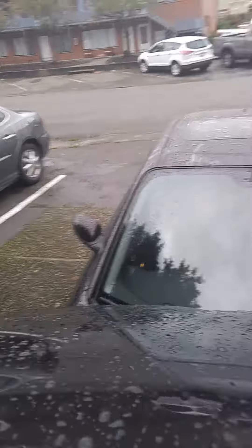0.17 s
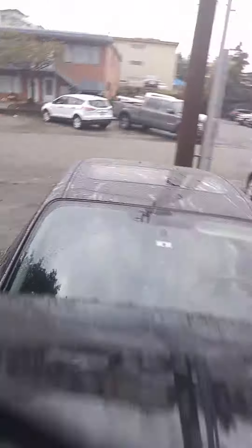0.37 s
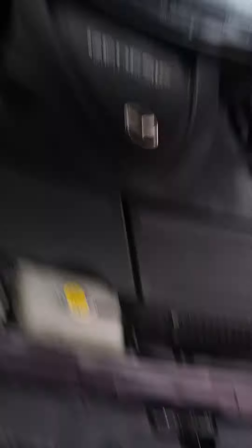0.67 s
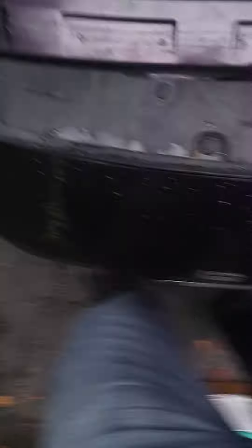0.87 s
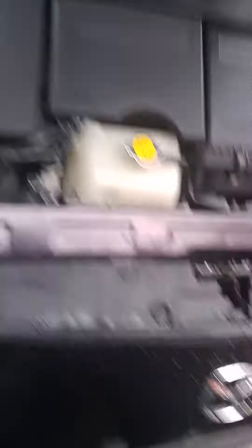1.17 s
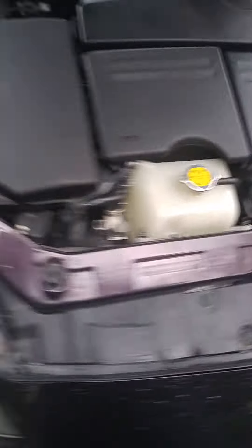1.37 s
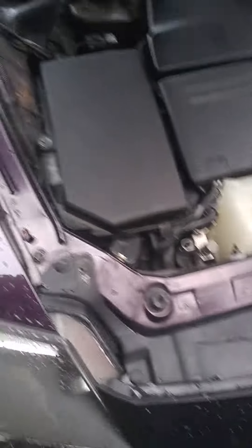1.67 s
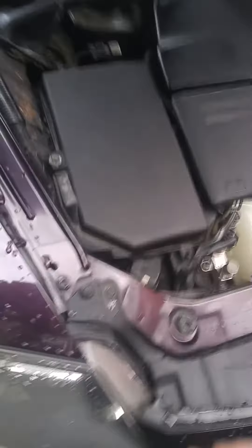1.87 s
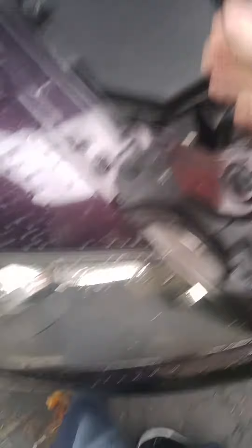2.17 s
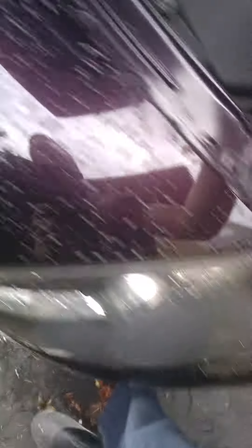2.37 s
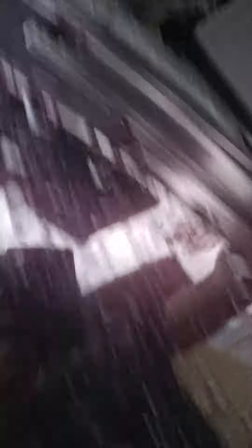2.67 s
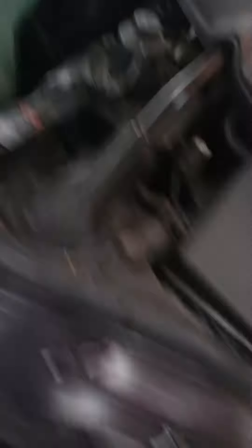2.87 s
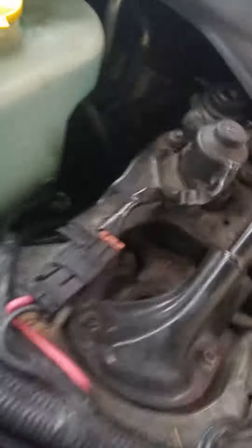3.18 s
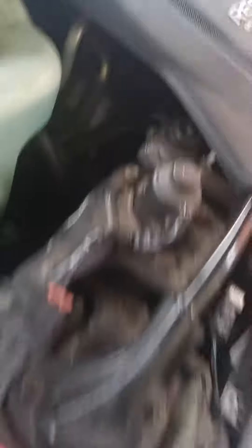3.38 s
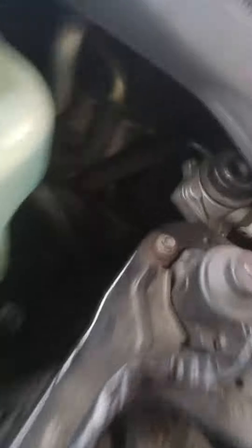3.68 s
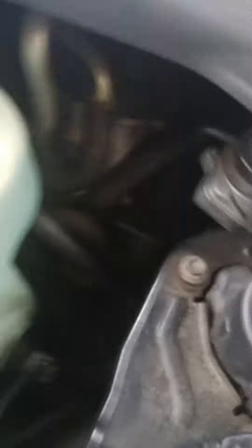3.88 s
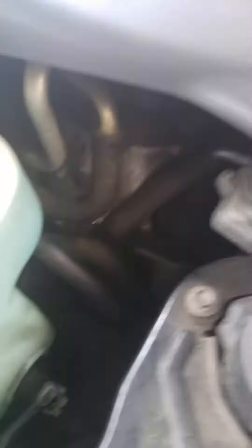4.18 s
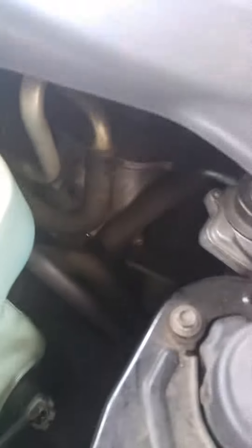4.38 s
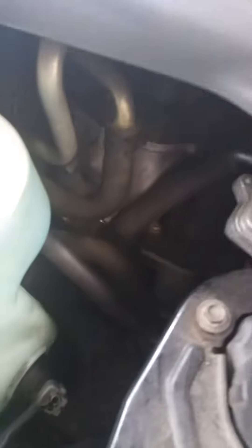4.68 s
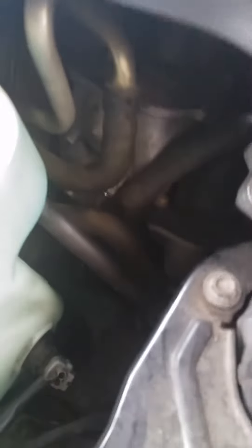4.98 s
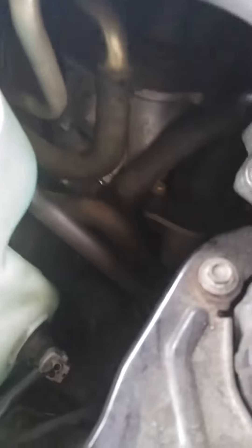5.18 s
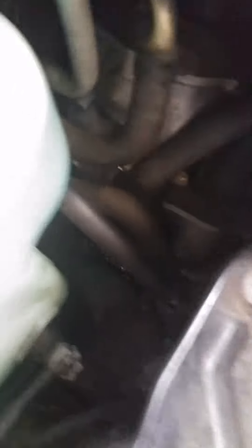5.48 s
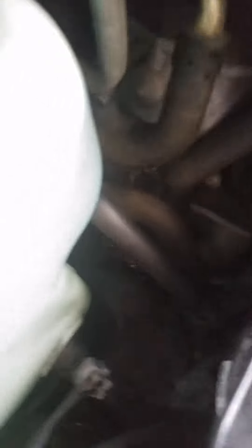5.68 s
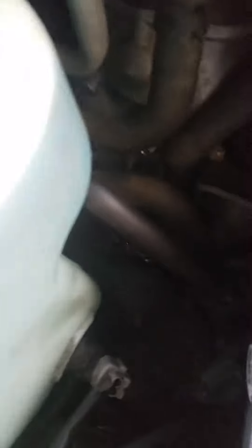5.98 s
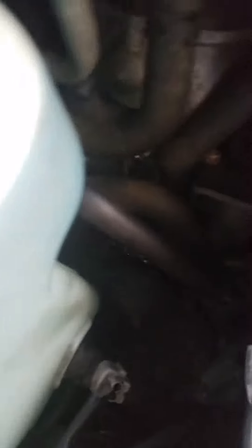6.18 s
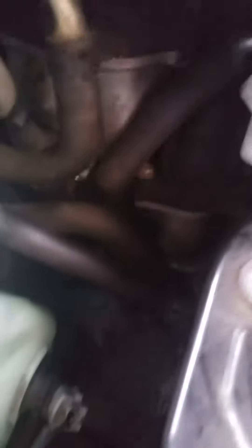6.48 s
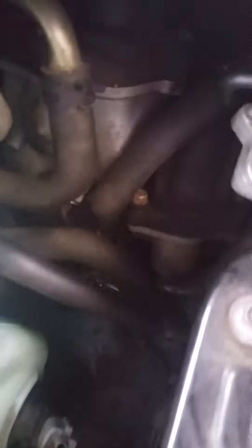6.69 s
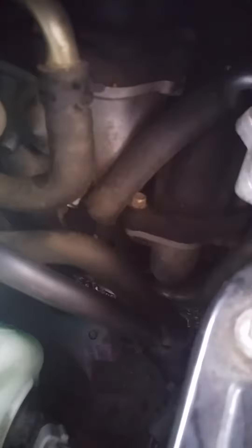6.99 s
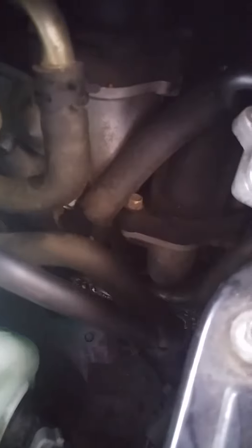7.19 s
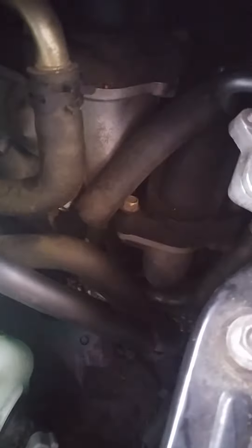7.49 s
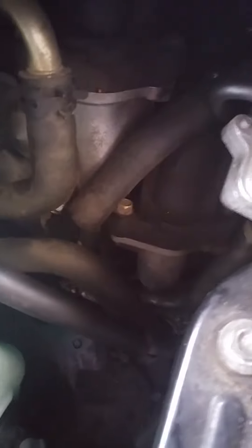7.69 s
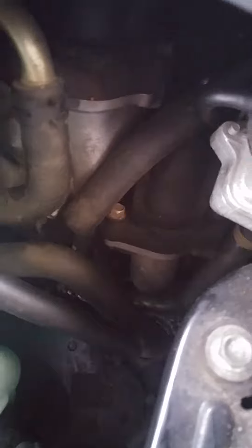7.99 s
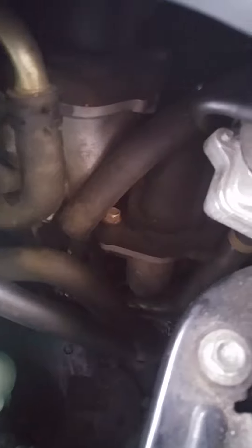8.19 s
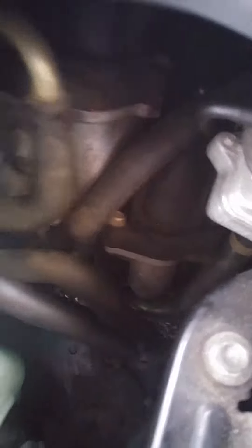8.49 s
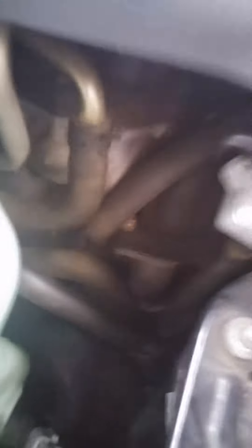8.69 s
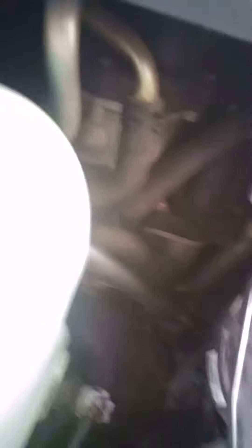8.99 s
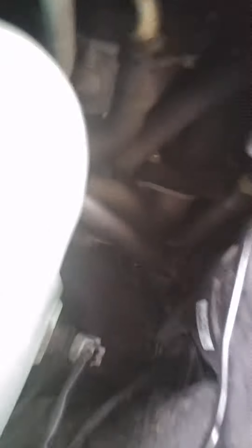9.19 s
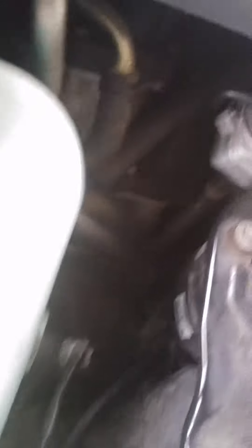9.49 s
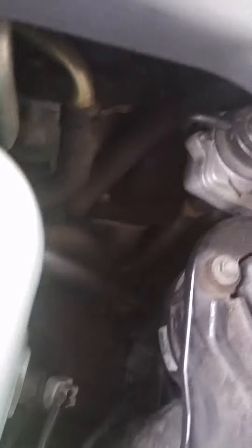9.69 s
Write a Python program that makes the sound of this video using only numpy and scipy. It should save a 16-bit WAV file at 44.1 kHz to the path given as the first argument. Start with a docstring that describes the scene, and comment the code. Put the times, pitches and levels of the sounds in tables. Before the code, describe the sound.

A car engine idles loudly close up in its open bay, a deep steady drone with rapid knocking and ticking hiss, its pitch sagging and recovering.

```python
"""Open engine bay of a car, a twin-rotor engine idling, heard close by on a hand-held camera's two microphone ports.
From the background inwards: low noise shakes the car, thin sines whine, filtered noise and ticks hiss in pulses.
Shaft orders boom in the bay, filtered clicks knock and thump in the housing, and a sine drone is the main source.
The idle sags, overshoots and settles; one shaft angle times the firings, blows, ticks and engine tones."""
import sys
import numpy as np
from scipy import signal
from scipy.fft import rfft, irfft
from scipy.io import wavfile
from scipy.ndimage import uniform_filter1d

SR = 44100
rng = np.random.default_rng(int(sys.argv[2]) if len(sys.argv) > 2 else 0)


def master(y):
    """Save y as 16-bit WAV."""
    cut = np.clip(np.atleast_2d(y).T, -1, 1)
    pcm = np.round(cut * 32767)  # scale
    wavfile.write(sys.argv[1], SR, pcm.astype(np.int16))


N = 434385
TIME = np.arange(N) / SR


def gain_of(db):
    """Decibels to amplitude gain."""
    return 10 ** (np.asarray(db) / 20)


def evened(x):
    """Scales to rms 1."""
    return x / np.sqrt(np.mean(x ** 2) + 1e-20)


def curves(rows):
    """Each column of a table after the time, interpolated to every sample."""
    seconds, *columns = np.transpose(rows)
    return [np.interp(TIME, seconds, column) for column in columns]


def during(start, end, fade_s):
    """1 between two times, with straight fades centred on them."""
    return np.clip(np.minimum(TIME - start, end - TIME) / fade_s + .5, 0, 1)


def wander(rate_hz):
    """Smooth random curve of rms 1, moving up to about the given rate."""
    size, control_rate = 8192, 500
    hz = np.fft.rfftfreq(size, 1 / control_rate)
    slow = irfft(rfft(rng.standard_normal(size)) / (1 + (hz / rate_hz) ** 4))
    return evened(np.interp(TIME, np.arange(size) / control_rate, slow))


def colour(x, points, rings=(), size=4096):
    """Causal minimum-phase filter with the given spectrum and narrow resonances on top; rms 1."""
    hz = np.abs(np.fft.fftfreq(size, 1 / SR))
    point_hz, point_db = np.transpose(points)
    db = np.interp(np.log(hz + 1), np.log(point_hz), point_db, left=-90, right=-90)
    for centre, width, lift in rings:
        db = db + lift / (1 + (2 * (hz - centre) / width) ** 2)
    log_spectrum = np.conj(signal.hilbert(np.log(gain_of(db))))
    taps = np.fft.ifft(np.exp(log_spectrum)).real
    return evened(signal.oaconvolve(np.atleast_2d(x), taps[None], axes=1)[:, :N])


def resonate(x, hz, width_hz):
    """A resonance of gain 1 whose centre follows a curve: shift down, smooth, shift back."""
    turn = np.exp(2j * np.pi * np.cumsum(hz) / SR)
    r = np.exp(-np.pi * width_hz / SR)
    return 2 * (turn * signal.lfilter([1 - r], [1, -r], x / turn)).real


def panned(x, pan_db):
    """Sets the left port's level over the right's: positive dB tips to the left."""
    return x * gain_of(np.array([pan_db, -pan_db]).reshape(2, -1) / 2)


def ports(x, lag_ms):
    """The right microphone port hears the sound later than the left, or earlier if the lag is negative."""
    x = np.ravel(x)
    return np.array([x, np.interp(TIME - lag_ms / 1000, TIME, x)])


def bay(x, echo, drift, count=6):
    """Early echoes from the walls of the bay; their paths shift as the camera moves."""
    out = x.copy()
    for delay in np.geomspace(.0011, .007, count):
        path_s = delay * rng.uniform(.8, 1.2) * (1 + drift * wander(0.53))
        out += echo * np.interp(TIME - path_s, TIME, x)
    return evened(out)


def blows(turns, pattern, spread_db, jitter_ms):
    """One click for every blow of every turn, uneven in strength and timing."""
    clicks = np.zeros(N)
    for share, db in pattern:
        at = np.flatnonzero(np.diff(np.floor(turns - share)) > 0)
        strength, late = rng.standard_normal(size=(400, 2))[:len(at)].T
        at = np.clip(at + np.round(late * jitter_ms * SR / 1000).astype(int), 0, N - 1)
        clicks[at] += gain_of(db + spread_db * np.clip(strength, -2, 1.5))
    return clicks


SHIFT_S = .2  # one pattern gives way to the next over this time


def shifting(turns, stretches, spread_db, jitter_ms):
    """Clicks whose pattern within the turn gives way to the next, each pattern of equal power."""
    out = np.zeros(N)
    for start, end, pattern in stretches:
        power = sum(gain_of(db) ** 2 for _, db in pattern)
        level = np.sqrt(during(start, end, SHIFT_S) / power)
        out += level * blows(turns, pattern, spread_db, jitter_ms)
    return out


def dying(clicks, decay_ms):
    """Each click becomes an exponential decay; rms 1."""
    return evened(signal.lfilter([1], [1, -np.exp(-1000 / (decay_ms * SR))], clicks))


# camera out of the engine's direct line: (start [s], end [s], depth [0-1])
SHADOWS = [(-1, 1.2, .85), (3.7, 5.05, 1), (8.8, 11, .65)]
FADE_S = .35  # also fades the swells of the hiss and the change of ticks


def shade():
    """How far the camera is out of the engine's direct line, 0-1."""
    return sum(depth * during(start, end, FADE_S) for start, end, depth in SHADOWS)


# low shaking of the car at the camera: (time [s], level [dB])
SHAKE_LEVEL = [(0, -38), (1.1, -41), (1.7, -35), (3.1, -46), (4, -38.5), (5.1, -41), (5.9, -43), (7.8, -43),
               (8.4, -39), (9.3, -46)]
# spectrum of that shaking: (frequency [Hz], relative density [dB per Hz])
SHAKE_SPECTRUM = [(20, -30), (42, -27), (60, -4.5), (76, -7), (95, -14), (135, -18), (160, -9)]
# spectrum of the hand's soft bump on the camera: (frequency [Hz], relative density [dB per Hz])
BUMP_SPECTRUM = [(40, -26), (70, -8), (130, -1), (210, -5), (280, -20), (380, -30)]
BUMP_START_S, BUMP_END_S, BUMP_PEAK_DB = 1.285, 1.39, -17.5


def rumble():
    """Low irregular shaking of the car, and one bump on the camera: two filtered noises."""
    arch = np.sin(np.interp(TIME, (BUMP_START_S, BUMP_END_S), [0, np.pi])) ** 2
    bump = gain_of(BUMP_PEAK_DB) * arch * colour(rng.standard_normal(N), BUMP_SPECTRUM)
    shake = gain_of(curves(SHAKE_LEVEL)[0]) * colour(rng.standard_normal(N), SHAKE_SPECTRUM)
    return ports(shake + bump, lag_ms=0.22)


# whistle that comes and goes: (start [s], end [s], level [dB rms])
WHISTLES = [(-.3, .35, -48.5), (6.91, 7.83, -45), (8.3, 8.85, -46), (9.498, 10.2, -45)]
WHISTLE_HZ, WHISTLE_FADE_S = 1414, 0.21
# whines of belt-driven parts: (start [s], end [s], multiple of the shaft rate, level at mid-arch [dB rms])
WHINES = [(1.397, 2.803, 74.9, -46.5), (3.2, 5.402, 74.9, -47.5), (3.9, 4.7, 62.5, -46),
          (8.2, 9.6, 74.9, -49), (2.9, 3.8, 48.1, -48), (5.085, 7.096, 48.15, -44.5), (7, 9.85, 48.1, -51),
          (8.802, 9.85, 42, -45.5)]


def whines(turns):
    """Thin sines follow the belt-driven parts; one whistle keeps its own pitch but for a slight phase drift."""
    level = sum(gain_of(db) * during(start, end, WHISTLE_FADE_S) for start, end, db in WHISTLES)
    out = level * np.sin(2 * np.pi * WHISTLE_HZ * TIME + 0.36 * wander(1.8))
    for start, end, order, db in WHINES:
        progress = np.clip((TIME - start) / (end - start), 0, 1)
        arch = np.sqrt(np.abs(np.sin(np.pi * progress)))
        gain = gain_of(db + 1.3 * wander(6))
        out += gain * arch * np.sin(2 * np.pi * order * turns + .22 * wander(19))
    return np.sqrt(2) * ports(out, lag_ms=0.094)


# ticks within one shaft turn, from above: (share of the turn, level [dB])
TICKS = [(.15, -8), (.36, -8), (.655, 0), (.83, -4.5)]
# ticks from low beside the housing: (share of the turn, level [dB])
LOW_TICKS = [(.33, -1), (.825, -1)]
LOW_START_S, LOW_END_S = 3.6, 5.1


def ticking(turns):
    """Sharp ticks of the moving parts, a few to each turn; low beside the housing another pair takes over."""
    low = during(LOW_START_S, LOW_END_S, FADE_S)
    usual = blows(turns, TICKS, spread_db=2, jitter_ms=.3)
    paired = blows(turns, LOW_TICKS, spread_db=2, jitter_ms=.3)
    decays = dying((1 - low) * usual + low * paired, decay_ms=6.5)
    return evened(uniform_filter1d(decays, size=40))  # softens the onsets over 0.9 ms


# the camera's path about the bay: (time [s], nearness [dB], left over right of the hiss [dB])
CAMERA = [(0, -4, -7.5), (.33, -1, -10), (.68, 3, -2.5), (.95, -0.5, 2.5), (2.3, -3, 3.5), (3.1, -0.5, 5.5),
          (4, 1, -0.5), (6.05, 1, 2), (8.3, 0.5, -0.5), (9.85, 1, 2)]
# ticking stands out more once the camera is down beside the engine: (time [s], strength re the steady hiss)
TICK_DEPTH = [(2.2, .42), (3, .62), (3.9, .85), (5.5, .85)]
# spectrum of the hiss: (frequency [Hz], relative density [dB per Hz])
HISS_SPECTRUM = [(1760, -23.5), (2900, -17), (3750, -15), (4860, -11), (6220, -2.5), (6950, -3), (7720, -4),
                 (8520, 0), (9400, -1), (10300, -6), (11500, -9.5), (12900, -12), (15100, -9.5),
                 (16000, -17)]
# thin metal parts that ring in the hiss: (frequency [Hz], width [Hz], lift [dB])
RINGS = [(4400, 200, 2.5), (6260, 150, 2.5), (6730, 70, 5.5), (8270, 160, 4.5)]
# parts that stand out at some camera angles: (start [s], end [s], low edge [Hz], high edge [Hz], lift [dB])
HISS_SWELLS = [(-3, 0.63, 8150, 8800, 3), (4, 4.25, 4300, 21000, 1), (6, 6.36, 5480, 6170, 7),
               (6, 6.4, 8700, 14000, 2.5)]
# spectrum of the churn: (frequency [Hz], relative density [dB per Hz])
CHURN_SPECTRUM = [(520, 3.5), (700, 13), (1000, 1.5), (1250, -4), (1600, -5), (2100, -4), (2600, -8),
                  (3200, -16), (4500, -28.5), (8000, -44)]
# levels at nearness 0; churn's share of the nearness, and its growth per firing a second above the usual idle
HISS_DB, CHURN_DB, CHURN_NEAR, CHURN_GROWTH_DB = -25, -29.5, 0.7, 0.44


def hiss(turns, excess_hz):
    """Steady rushing air, noise ticking in step with the shaft, and the duller churn of the moving parts."""
    near_db, pan_db = curves(CAMERA)
    swell = ticking(turns)
    noises = [bay(side, echo=.25, drift=.015) for side in rng.standard_normal((4, N))]
    air, grit = np.array(noises).reshape(2, 2, N)  # two stereo pairs
    steady = colour(air * gain_of(0.22 * wander(150)), HISS_SPECTRUM, RINGS)
    ticks = colour(grit * swell, HISS_SPECTRUM, RINGS + [(6920, 2700, 5.7)])
    depth = curves(TICK_DEPTH)[0]
    fizz = (steady + depth * ticks) / np.hypot(1, depth)
    for start, end, low_hz, high_hz, lift_db in HISS_SWELLS:
        band_filter = signal.butter(2, [low_hz, high_hz], "band", fs=SR, output="sos")
        band = signal.sosfiltfilt(band_filter, fizz)
        fizz = fizz + (gain_of(lift_db * during(start, end, FADE_S)) - 1) * band
    churn = colour((1 + 0.073 * swell) * rng.standard_normal((2, N)), CHURN_SPECTRUM)
    churn_db = CHURN_DB + CHURN_NEAR * near_db + CHURN_GROWTH_DB * excess_hz
    return gain_of(HISS_DB + near_db) * panned(fizz, pan_db) + gain_of(churn_db) * panned(churn, -2.4)


# standing waves the camera passes through: (start [s], end [s], multiple of the shaft rate, level [dB rms])
BOOMS = [(-.2, .75, 24, -35), (0.704, 1.245, 20, -36), (.75, 1.252, 22, -35), (1.5, 2.15, 22, -42),
         (1.45, 2.148, 27, -33.5), (2.553, 3.504, 25, -34), (3.1, 3.605, 27, -28.5), (3.657, 4.5, 20, -40),
         (3.75, 4.5, 24, -52), (5.3, 8.6, 23, -52), (8.8, 10, 34, -44)]
BOOM_FADE_S = 0.21


def booms(turns, knocking):
    """Single shaft orders stand in the bay as sines, each port taking its phase from the knocking there."""
    out = np.zeros((2, N))
    for start, end, order, db in BOOMS:
        level = gain_of(db + 2.2 * wander(16)) * during(start, end, BOOM_FADE_S)
        here = level > 0
        wave = np.exp(2j * np.pi * round(order) * turns[here])
        fed = uniform_filter1d(knocking[:, here] / wave, size=12000, axis=1)
        out[:, here] += level[here] * (wave * np.exp(1j * np.angle(fed))).real
    return np.sqrt(2) * out


# single knocks that land harder: (time [s], level re a whole turn's blows [dB])
HARD_KNOCKS = [(2.056, 0), (2.52, 1.5), (2.597, -0.5), (2.636, 0), (2.714, 0), (2.752, 3), (2.868, 1.5),
               (2.945, 2.5), (3.003, 3), (3.099, 2), (3.176, 1), (3.252, -2), (3.327, .5), (3.492, 0.5),
               (3.527, 0.5), (3.599, 1), (5.971, -1), (6.434, 1), (6.546, -1), (6.657, -1.5), (7.219, 0.5),
               (7.555, -1), (7.855, 0)]
# the housing takes a moment to answer a blow; a hard blow replaces the plain ones this close to it
ANSWER_S, HARD_REACH_S = .003, .005


def harder(clicks):
    """Now and then one blow lands harder, in place of its neighbours."""
    out = clicks.copy()
    reach = round(HARD_REACH_S * SR)
    for seconds, hard_db in HARD_KNOCKS:
        at = round((seconds - ANSWER_S) * SR)
        out[at - reach:at + reach] = 0
        out[at] = gain_of(hard_db)
    return out


# beamed knocks swell and swing as the camera passes: (time [s], level [dB], left over right [dB])
KNOCK_LEVEL = [(0, -32.5, -10), (.45, -31, -11), (.73, -22.5, 10), (.92, -35, 6), (1.2, -34, 9),
               (1.43, -26, 9.5), (2.03, -21.5, 6), (2.26, -30.5, 10), (2.47, -31, 8), (2.6, -23.5, 10),
               (3.1, -26, -1), (3.6, -20, -2.5), (3.77, -25, -4.5), (4.4, -30, -9), (4.6, -26, -5),
               (5.2, -24, -5.5), (8.4, -26.5, -9), (9.4, -26.5, -2)]
# the housing's ranges: (time [s], deep thump level [dB], upper thump level [dB], upper ring level [dB])
HOUSING_LEVEL = [(0.0, -35.5, -42, -69), (1.97, -41, -37.5, -50), (2.3, -33.5, -32, -53),
                 (2.8, -32.5, -36.5, -37), (3.3, -26, -37, -34), (3.6, -26, -39, -43),
                 (3.8, -30.5, -36, -50), (4.09, -35, -37, -59), (4.85, -33.5, -31.5, -37),
                 (5.73, -29, -32.5, -39), (8.47, -30, -31.5, -37), (9.1, -27, -39, -36),
                 (9.85, -26, -41, -35)]
# blows in a shaft turn, by idle and camera place: (start [s], end [s], [(share of the turn, level [dB]), ..])
BLOWS = [(-1, 1.3, [(.079, -2), (.286, -6), (.617, 0), (.836, -1)]), (1.3, 2.3, [(.086, -3.5), (.369, -5),
         (.628, 0), (.818, -8)]), (2.3, 3.3, [(.134, 0), (.346, -7.5), (.623, -4), (.938, -11)]),
         (3.3, 3.7, [(.104, -3), (.316, -8), (.593, 0), (.908, -10)]), (3.7, 5.05, [(.079, -2), (.286, -6),
         (.617, 0), (.836, -1)]), (5.05, 8.8, [(.142, -1), (.315, -8), (.625, 0), (.736, -5)]),
         (8.8, 11, [(.142, -1), (.262, -2.5), (.664, 0), (.753, -5.5)])]
# hollow of the bay along the camera's path: (time [s], centre [Hz], share of the knock through it, held to 0-1)
HOLLOW = [(0, 704, 0.49), (.7, 766, 0.71), (.9, 620, 0.24), (1.35, 700, 1.2), (1.7, 700, 0.37),
          (2.15, 725, 0.97), (2.6, 707, 0.67), (3.1, 690, 0.67), (3.55, 764, 0.91), (3.8, 660, 0.19),
          (5.2, 710, 0.24), (8.3, 650, 0.17), (9, 610, 0.4), (9.85, 650, 0.9)]
# spectrum of the knock: (frequency [Hz], relative density [dB per Hz])
KNOCK_SPECTRUM = [(445, -69), (505, -18.5), (552, 4), (610, 4.5), (740, 3), (790, -1), (860, -9),
                  (950, -12), (1090, -31.5), (1700, -17.5)]
# spectrum of the housing's upper ring: (frequency [Hz], relative density [dB per Hz])
UPPER_RING_SPECTRUM = [(700, -44), (805, -2.5), (880, 2.5), (940, -0.5), (1020, -18.5), (1300, -29)]
HOLLOW_WIDTH_HZ = 273  # of each of two passes
# the right port's greatest lag, and the left-right dB that sets how soon it is reached
PORT_LAG_MS, FULL_SIDE_DB = .36, 6
# rattling tail re the direct knock: in the open, and added in full shadow
OPEN_RATTLE, SHADOW_RATTLE = .2, .12


def knocks(turns):
    """Uneven clicks with a noisy rattling tail ring the bay's hollow; colour and port lag follow the camera."""
    level_db, pan_db = curves(KNOCK_LEVEL)
    ring_db = curves(HOUSING_LEVEL)[2]
    hollow_hz, focus = curves(HOLLOW)
    focus = np.clip(focus, 0, 1)
    lag_ms = PORT_LAG_MS * np.tanh(pan_db / FULL_SIDE_DB)
    clicks = harder(shifting(turns, BLOWS, spread_db=.8, jitter_ms=.06))
    loose = OPEN_RATTLE + SHADOW_RATTLE * shade()
    rattle = loose * evened(dying(clicks, decay_ms=10) * rng.standard_normal((2, N)))
    drive = (evened(ports(clicks, lag_ms)) + rattle) / np.hypot(1, loose)
    body = colour(drive, KNOCK_SPECTRUM)
    once = resonate(body, hollow_hz, HOLLOW_WIDTH_HZ)
    hollow = evened(resonate(once, hollow_hz, HOLLOW_WIDTH_HZ))
    body = evened((1 - focus) * body + focus * hollow)
    ring = gain_of(ring_db) * colour(drive, UPPER_RING_SPECTRUM)
    return panned(gain_of(level_db) * body + ring, pan_db)


# the two rotors fire in turn, limping late on: (start [s], end [s], [(share of the turn, level [dB]), ..])
FIRINGS = [(-1, 8.75, [(.97, -2), (.47, 0)]), (8.75, 11, [(.86, -4), (.46, 0)])]
# spectrum of the deep thump: (frequency [Hz], relative density [dB per Hz])
DEEP_SPECTRUM = [(205, -30), (235, -27), (262, 3), (315, 3), (345, -7.5), (385, -19.5), (430, -37)]
# spectrum of the upper thump: (frequency [Hz], relative density [dB per Hz])
UPPER_SPECTRUM = [(330, -8), (370, 1.5), (400, -2), (440, 4), (475, 5.5), (500, -10), (530, -29),
                  (620, -75)]
# soft burble: (time [s], level [dB])
BURBLE_LEVEL = [(0, -47), (1.1, -36), (1.8, -39), (2.5, -38), (3.3, -31), (4.1, -36), (4.6, -29),
                (5.6, -36), (6.9, -29), (8.5, -31.5), (9.6, -29.5)]
# spectrum of the burble: (frequency [Hz], relative density [dB per Hz])
BURBLE_SPECTRUM = [(110, -16), (150, 0), (195, 3), (250, -5.5), (320, -11), (420, -13), (600, -24)]


def thumps(turns):
    """Each firing pushes the housing, which answers in two ranges; uneven burning adds a soft noise burble."""
    deep_db, upper_db, _ = curves(HOUSING_LEVEL)
    pushes = shifting(turns, FIRINGS, spread_db=.8, jitter_ms=.07)
    deep = gain_of(deep_db) * colour(pushes, DEEP_SPECTRUM)
    burble = gain_of(curves(BURBLE_LEVEL)[0]) * colour(rng.standard_normal(N), BURBLE_SPECTRUM)
    # the upper range answers a moment later
    upper = gain_of(upper_db) * colour(np.roll(pushes, round(.004 * SR)), UPPER_SPECTRUM)
    return panned(ports(deep + upper + burble, lag_ms=0.26), -1.0)


# orders around the drone: (multiple of the shaft rate, level [dB rms], change in full shadow [dB])
HUM_ORDERS = [(2, -51.5, 2), (3, -54, -11), (4, -32.5, 3.5), (5, -42, 1), (7, -49, 7), (8, -35.5, 8.5),
              (9, -45, 0)]
DRONE_DB, DRONE_NEAR = -17.5, 0.65  # rms level at nearness 0, and share of the nearness
# the drone leans by these shares of the left-right dB of the hiss and of the knocks
LEAN_WITH_HISS, LEAN_WITH_KNOCKS = 0.2, 0.24


def drone(turns):
    """The exhaust booms as a sine at six cycles a shaft turn, with weaker shaft orders around it."""
    near_db, hiss_pan_db = curves(CAMERA)
    pan_db = LEAN_WITH_HISS * hiss_pan_db + LEAN_WITH_KNOCKS * curves(KNOCK_LEVEL)[1]
    boom_db = DRONE_DB + DRONE_NEAR * near_db + .25 * wander(14)
    boom = gain_of(boom_db) * np.sin(2 * np.pi * 6 * turns)
    shadow = shade()
    for order, db, lift_db in HUM_ORDERS:
        sway = 1 + 0.016 * wander(21)
        phase = 2 * np.pi * (round(order) * turns + rng.random()) + 0.065 * wander(2.9)
        boom += gain_of(db + lift_db * shadow) * sway * np.sin(phase)
    return np.sqrt(2) * panned(ports(boom, lag_ms=0.17), pan_db)


# the idle sags, overshoots and settles: (time [s], firing rate [firings a second])
SPEED = [(0, 57.34), (.58, 57.7), (1.3, 57.3), (1.39, 55.64), (2.02, 56.26), (2.53, 51.99), (2.84, 51.42),
         (3.18, 52.22), (3.66, 56.45), (4.13, 58.2), (4.8, 56.39), (5.05, 56.1), (5.35, 54.44),
         (7.17, 53.4), (7.98, 53.43), (9.24, 51.3), (9.85, 52.25)]
FLYWHEEL_S, IDLE_HZ = .25, 54  # the flywheel smooths speed over this time; usual idle in firings a second
START_TURN = .11  # shaft angle at the start, in turns


def scene():
    """One shaft angle, two firings a turn, drives every part of the engine."""
    firing_hz = uniform_filter1d(curves(SPEED)[0], round(FLYWHEEL_S * SR), mode="nearest")
    shaft_hz = firing_hz / 2 * (1 + 0.0005 * wander(6.7))
    turns = START_TURN + np.cumsum(shaft_hz) / SR
    knocking = knocks(turns)
    background = rumble() + whines(turns) + hiss(turns, firing_hz - IDLE_HZ)
    return background + booms(turns, knocking) + knocking + thumps(turns) + drone(turns)


def record(dry):
    """The recorder's band limit: a low-pass at 16.05 kHz."""
    taps = signal.firwin(511, 16050, window=("kaiser", 9), fs=SR)
    return signal.oaconvolve(dry, taps[None], "same")


dry = scene()
out = record(dry)
master(out)
```